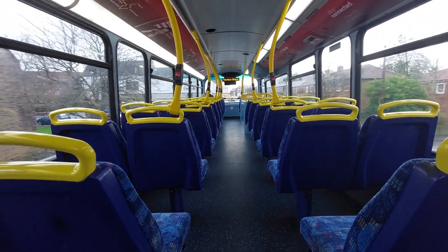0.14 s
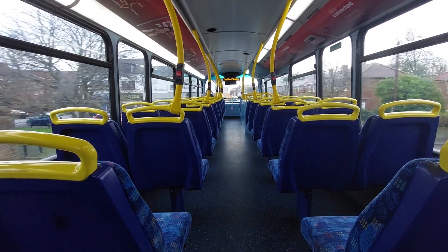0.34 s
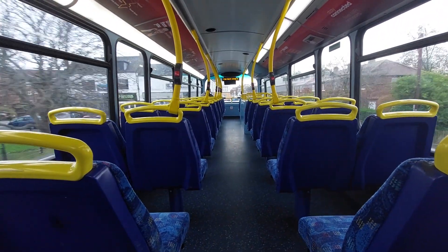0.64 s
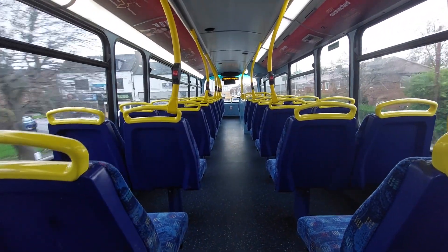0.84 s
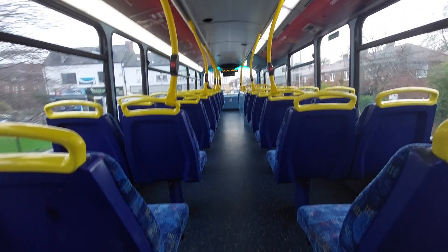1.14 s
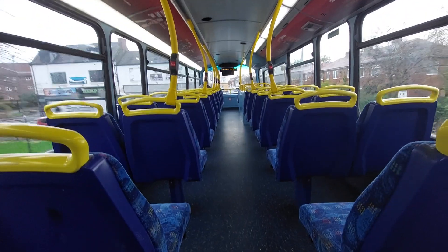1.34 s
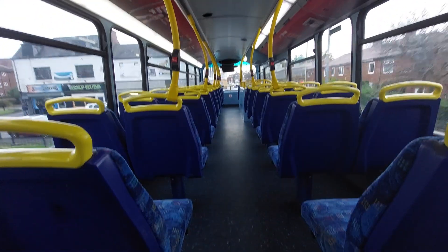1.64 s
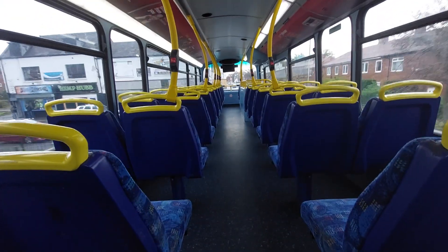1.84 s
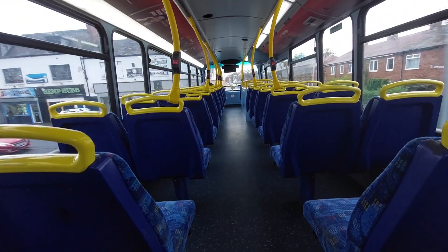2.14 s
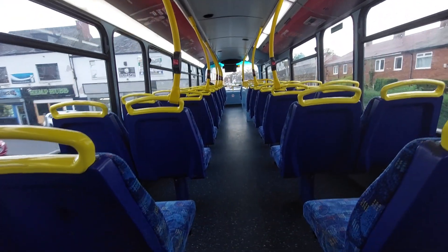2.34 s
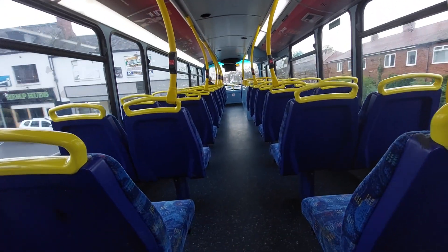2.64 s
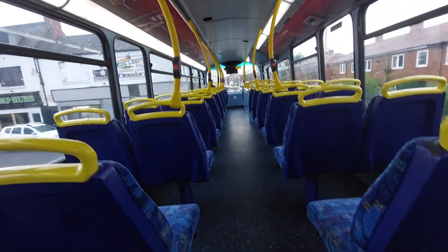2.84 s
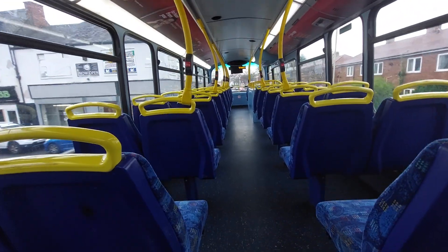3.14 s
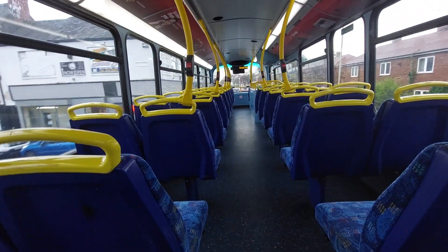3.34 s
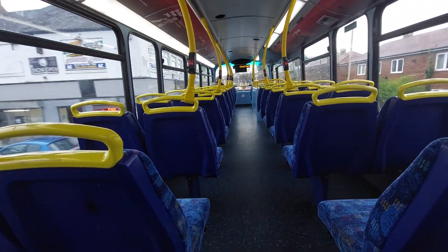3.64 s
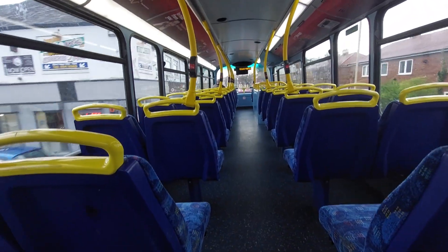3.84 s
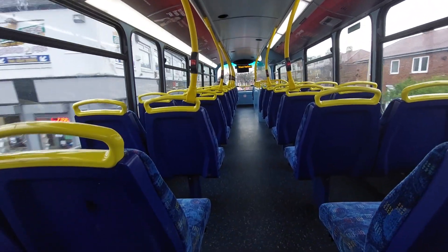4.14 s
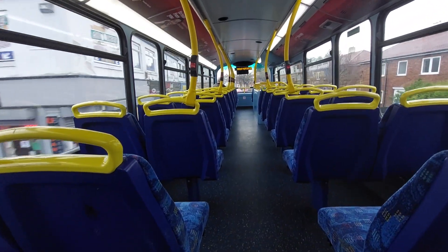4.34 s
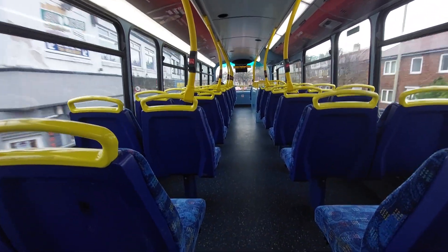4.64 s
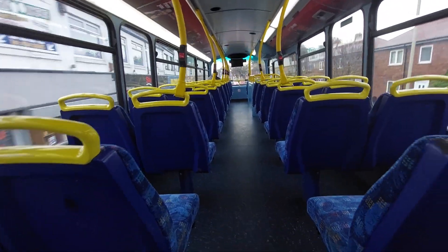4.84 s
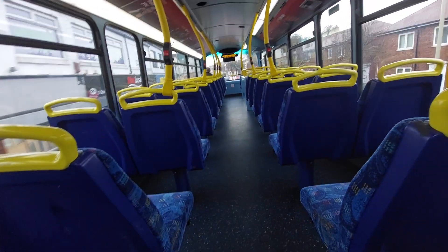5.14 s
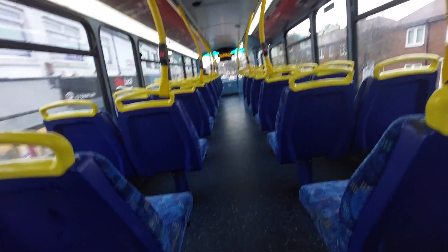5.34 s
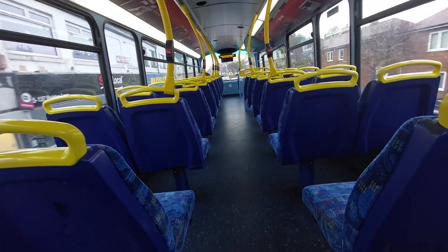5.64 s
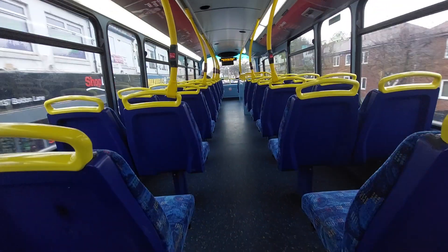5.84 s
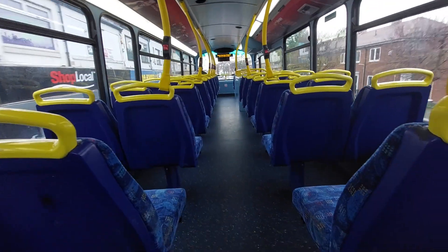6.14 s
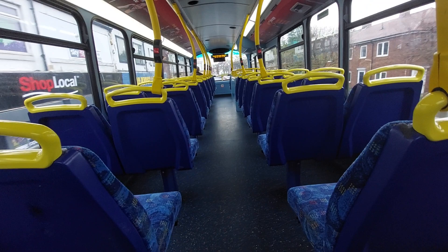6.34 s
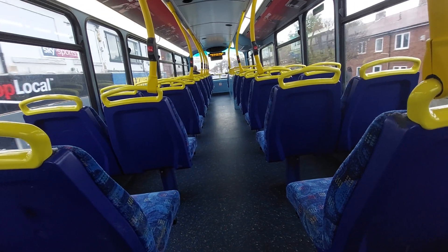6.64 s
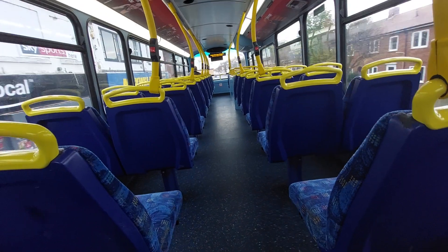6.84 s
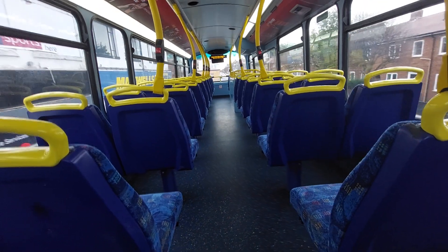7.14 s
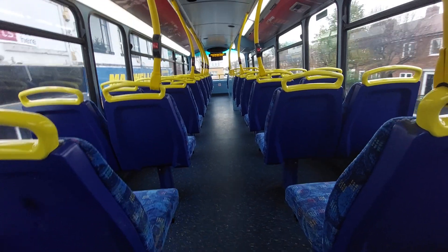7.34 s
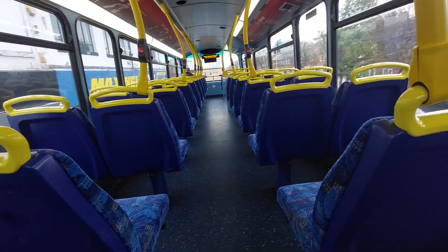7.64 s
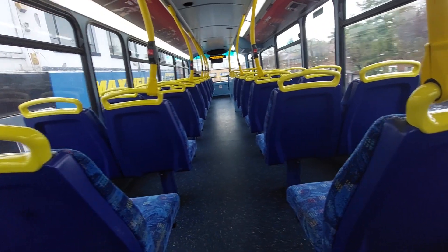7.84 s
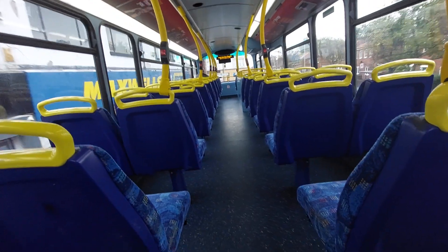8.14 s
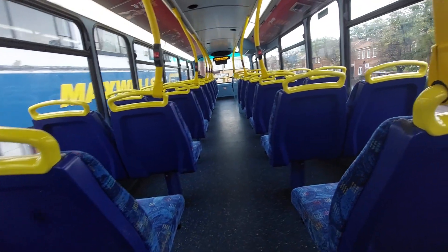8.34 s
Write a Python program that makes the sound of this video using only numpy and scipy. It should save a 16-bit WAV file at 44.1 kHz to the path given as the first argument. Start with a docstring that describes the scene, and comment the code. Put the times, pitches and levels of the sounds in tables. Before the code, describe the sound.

A close, enclosed bus cabin in stereo, dominated by bassy rumble with muffled tyre roar. The engine pulses low and changes revs, while a wavering axle whine slides downward as the bus slows. Small bumps, dry rattles, tiny metallic tinkles, a faint valve hiss and a sagging squeak decorate the ride. One cluster of hard thuds shakes the body, followed by a calmer stretch and returning rumble.

```python
"""Road rumble booms through the upper deck of a double-decker bus, over the diesel's throb.
The rumble is filtered noise; engine, heater fan, drone and sinking axle whine are wavering sine tones.
Bumps and a pothole ring the body as decaying sines; panels and trim rattle as short noise bursts.
A valve hisses once in pipe-coloured noise, rubber squeaks in sagging tones, and a metal fitting tinkles.
As the bus slows, the whine sinks in pitch, coming and going, strongest just before it cuts out near 7.2 s."""
import sys
import numpy as np
from scipy import signal
from scipy.fft import rfft, irfft, next_fast_len
from scipy.io import wavfile
from scipy.ndimage import uniform_filter1d

SR = 44100
rng = np.random.default_rng(int(sys.argv[2]) if len(sys.argv) > 2 else 0)


def unload_audio(sound):
    """Save the sound as a 16-bit wav file, at the path given as the first command line argument."""
    columns = np.transpose(np.atleast_2d(sound))
    # keep every value between -1 and 1, then stretch to whole-number steps
    steps = np.round(np.clip(columns, -1, 1) * 32767)
    wavfile.write(sys.argv[1], SR, steps.astype(np.int16))


N = 373968
TIME = np.arange(N) / SR


def undb(db):
    """Turn decibels into amplitude gain."""
    return 10 ** (np.asarray(db) / 20)


def unit(x):
    """Scale to rms 1."""
    return x / np.sqrt(np.mean(x ** 2))


def decay(t, ring_s):
    """Exponential die-away that loses 60 dB in ring_s."""
    return np.exp(-np.log(1000) * t / ring_s)


def curves(table):
    """Join each column of a table by straight lines in time."""
    s, *columns = np.transpose(table)
    return [np.interp(TIME, s, column) for column in columns]


def resonance_db(hz, peaks):
    """Lift that (centre [Hz], width [Hz], lift [dB]) resonances give to a frequency."""
    return sum(lift / (1 + (2 * (hz - centre) / width) ** 2) for centre, width, lift in peaks)


def colour(x, spectrum, peaks=()):
    """Minimum-phase filter with a (frequency [Hz], gain [dB]) outline and optional resonances."""
    size = next_fast_len(N + 8192)
    f = np.maximum(np.arange(size // 2 + 1) * SR / size, 1)
    hz, db = np.transpose(spectrum)
    gain_db = np.interp(np.log(f), np.log(hz), db) + resonance_db(f, peaks)
    # folding the cepstrum forward in time makes the filter causal
    cepstrum = irfft(np.log(undb(gain_db)), size)
    cepstrum[1:size // 2] *= 2
    cepstrum[size // 2 + 1:] = 0
    response = np.exp(rfft(cepstrum))
    return irfft(rfft(x, size) * response, size)[..., :N]


def walk(rate):
    """Smooth random drift of rms 1 that changes about rate times a second."""
    k = max(int(SR / rate), 1)
    steps = np.repeat(rng.standard_normal(N // k + 1), k)
    return unit(uniform_filter1d(steps, k)[:N])


# stereo width of diffuse sound: (frequency [Hz], side minus mid [dB])
WIDTH = [(30, -24), (60, -4), (125, -18), (250, -9), (500, -5), (1000, 4), (2000, 0), (16000, 0.5)]
# the cabin's many narrow modes ripple the treble
MODE_RIPPLE_DB, MODE_SPACING_HZ, MODE_FROM_HZ = 1.6, 32, 900


def diffuse(spectrum, peaks=()):
    """Cabin-filling noise with mid of rms 1, its treble rippled by narrow modes and its sides set by WIDTH."""
    hz = np.arange(MODE_FROM_HZ, SR / 2, MODE_SPACING_HZ)
    ripple_db = MODE_RIPPLE_DB * rng.standard_normal(len(hz)) * (hz > MODE_FROM_HZ)
    noise = colour(rng.standard_normal((2, N)), np.column_stack([hz, ripple_db]))
    mid, side = colour(noise, spectrum, peaks)
    side = colour(side, WIDTH)
    return np.array([mid + side, mid - side]) / np.std(mid)


def tone(hz, flutter, spread):
    """A sine whose strength and phase waver as the body flexes, a little differently on each side."""
    carrier = np.sqrt(2) * np.exp(2j * np.pi * np.cumsum(hz * np.ones(N)) / SR)
    mid = (carrier * (1 + flutter * (walk(11) + 1j * walk(11)))).imag
    side = spread * (carrier * (1j + .5 * walk(4.6))).imag
    return np.array([mid + side, mid - side])


def blows(rows, ring_s, rise_s, chatter, crack_db, crack_s):
    """Envelope of (time [s], level [dB]) blows: a brief crack over an uneven tail that dies away."""
    t = TIME[:SR]
    fall = decay(t, ring_s) + undb(crack_db) * np.exp(-t / crack_s)
    shape = fall * (1 - np.exp(-t / rise_s))
    power = np.zeros(N + SR)
    for s, db in rows:
        start = int(s * SR)
        power[start:start + SR] += (undb(db) * shape) ** 2
    return np.sqrt(power[:N]) * undb(chatter * walk(400))


# roughness of the road: (time [s], rumble level [dB])
ROAD = [(0, -27.5), (1.9, -27.5), (2.4, -28), (3.5, -28.5), (4.7, -26.5), (5.05, -31), (5.45, -26.5),
        (6, -33.5), (6.7, -35), (7.25, -27.5), (8.48, -27.5)]
# outline of the rumble: (frequency [Hz], relative gain [dB])
RUMBLE = [(20, -7.5), (32, -6), (43, 4), (62, 0), (80, 1), (135, -.5), (185, -0.5), (245, -4.5),
          (330, -8.5), (450, -15.5), (680, -18), (950, -32), (1600, -64.5)]
# cabin resonances in the rumble: (centre [Hz], width [Hz], lift [dB])
CABIN = [(159.4, 14, 5), (233.3, 16, 2.5), (318.5, 27, 5.5), (591, 15, 4.5), (700, 34, -0.5)]
# outline of the tyre roar: (frequency [Hz], relative gain [dB])
ROAR = [(400, -4), (800, 6), (1200, 2), (1750, 2.5), (2500, -4.5), (3400, -12), (5000, -15.5),
        (7300, -21.5), (8800, -32), (10500, -34), (12000, -28), (16000, -35)]
ROAR_DB = -21.5  # relative to the rumble


def road():
    """The road shakes the body shell into a resonant rumble, and tyre roar rides on top."""
    db, = curves(ROAD)
    rumble = undb(0.92 * walk(14)) * diffuse(RUMBLE, CABIN)
    roar = undb(ROAR_DB + 0.67 * walk(24)) * diffuse(ROAR)
    return undb(db) * (rumble + roar)


# diesel speed and throb: (time [s], firing rate [Hz], firing tone level [dB], octave level [dB])
ENGINE = [(0, 44.8, -35, -36), (.9, 43, -35, -42), (1.62, 43.4, -34.5, -40), (1.9, 50.3, -28, -38),
          (2.2, 57.3, -42, -35.5), (2.75, 55.7, -39, -34.5), (2.95, 55.7, -39, -39),
          (3.25, 55.3, -29.5, -40), (4.5, 53.1, -29, -39), (4.7, 52.9, -35, -42), (5.05, 52.3, -29, -42),
          (5.3, 51.5, -35, -43), (6.5, 47.6, -38.5, -46), (7.3, 45.5, -31, -37), (7.7, 51.3, -29, -38),
          (8.1, 54.7, -30.5, -34.5), (8.48, 52.4, -29, -44)]


def engine():
    """Only the four lowest harmonics of the uneven firings reach the upper deck."""
    hz, firing_db, octave_db = curves(ENGINE)
    firing = tone(hz, flutter=.2, spread=.1)
    octave = tone(2 * hz, flutter=.2, spread=.2)
    third = tone(3 * hz, flutter=.25, spread=.25)
    fourth = tone(4 * hz, flutter=.25, spread=.3)
    upper = octave + undb(-5.0) * third + undb(-6.5) * fourth
    return undb(firing_db) * firing + undb(octave_db) * upper


# axle gears, turning with the road speed: (time [s], mesh rate [Hz], relative whine level [dB])
AXLE = [(0, 512, -42), (.6, 502, -44.5), (.85, 495, -48), (1.3, 489, -42.5), (1.55, 478, -49),
        (1.85, 470, -48), (2.1, 461, -55), (2.75, 445, -43), (3.25, 440, -48), (3.5, 436, -54),
        (3.85, 433, -47), (4.6, 424.5, -45), (4.95, 416, -50), (6.35, 388, -51), (6.55, 383.5, -42.5),
        (7.12, 368, -38), (7.3, 366, -63)]
# partials of the tyre and shaft drone: frequency as a share of the mesh rate [ratio]
DRONE_ORDERS = [.105, .209, .319, .478]
# drone partials swelling and fading: (time [s], level of each of the four partials [dB])
DRONE = [(0, -39, -43, -33, -55), (.9, -40, -43, -36.5, -46), (1.35, -39, -45, -38.5, -34),
         (1.75, -41, -44, -36, -38), (2.0, -38, -44, -29.5, -44.5), (2.3, -53, -40, -39, -45),
         (3, -50, -39, -40, -45), (4.5, -49, -38, -39, -48), (6.5, -48, -45.5, -54, -59),
         (8.48, -48, -44, -47, -39)]


def driveline():
    """Gear whine and the drone of shaft and tyres sink in pitch together with the road speed."""
    hz, whine_db = curves(AXLE)
    drone = 0
    for share, db in zip(DRONE_ORDERS, curves(DRONE)):
        drone = drone + undb(db) * tone(share * hz, flutter=.2, spread=.2)
    # speed shakes the whine; it steadies as the bus slows
    shaking = (hz - np.min(hz)) / np.ptp(hz)
    shaken_hz = hz * (1 + .004 * shaking * walk(18))
    whine = tone(shaken_hz, flutter=.15 + .4 * shaking, spread=.7)
    return undb(whine_db - 3) * whine + drone


# wheels over bumps and through a pothole: (time [s], relative level [dB], thump pitch [Hz])
THUDS = [(1.189, -28, 89.5), (1.799, -27.5, 171), (1.94, -27.5, 150), (4.755, -26.5, 315),
         (5.299, -22, 258), (5.313, -17, 200), (5.342, -21, 312.5), (5.383, -13, 216), (5.431, -18, 165),
         (5.458, -20, 234), (5.625, -25.5, 237.5), (5.776, -27.5, 301), (7.135, -31, 148)]
# modes of a thump: (share of its pitch [ratio], level [dB], ring time [s])
THUMP_MODES = [(.36, -2.5, .14), (.72, -2, .1), (1, 0, .09), (1.47, -4, 0.083), (2.3, -11.5, .06),
               (3.3, -17.5, .05)]
# outline of the booming body: (frequency [Hz], relative gain [dB])
BODY = [(25, -48), (50, 4), (80, 3.5), (125, -3.5), (175, -1.5), (245, 1.5), (340, -2.5), (480, -16.5),
        (700, -29), (1100, -31), (3000, -64)]
# body shell resonances when jolted: (centre [Hz], width [Hz], lift [dB])
SHELL = [(75.2, 11, 8), (166, 28, 8), (263, 29, 9.5), (332, 20, 5)]
# outline of loose panels, here and in the rattles: (frequency [Hz], relative gain [dB])
PANEL = [(150, 2.5), (320, 14.5), (700, 11.5), (1100, 6), (1900, 2), (3000, -10), (5000, -18), (8000, -26),
         (16000, -47)]
THUMP_DB, THUMP_PUSH_S = 3.5, .003
THUD_TAIL_DB, THUD_KNOCK_DB, THUD_RING_S = -5.5, -17.5, 0.5  # shell boom, weaker panel chatter


def jolts():
    """Each jolt thumps one part of the body shell, then the whole shell booms and its panels chatter."""
    thumps, t = np.zeros(N + SR), TIME[:SR]
    push = 1 - np.exp(-(t / THUMP_PUSH_S) ** 2)
    for s, db, hz in THUDS:
        ring = 0
        for share, mode_db, ring_s in THUMP_MODES:
            ring = ring + undb(mode_db) * decay(t, ring_s) * np.sin(2 * np.pi * share * hz * t)
        start = int(s * SR)
        thumps[start:start + SR] += undb(db) * push * ring
    hits = [(s, db) for s, db, _ in THUDS]
    shaking = blows(hits, THUD_RING_S, rise_s=0.0024, chatter=1.8, crack_db=1, crack_s=.008)
    tail = undb(THUD_TAIL_DB) * diffuse(BODY, SHELL) + undb(THUD_KNOCK_DB) * diffuse(PANEL)
    return undb(THUMP_DB) * thumps[:N] + shaking * tail


# fine buzz of loose fittings, also guiding the stray ticks: (time [s], relative level [dB])
BUZZ = [(0, -80), (.7, -76), (.9, -64), (1.6, -74), (2.2, -67), (3.15, -61.5), (3.5, -69), (4.3, -66),
        (4.8, -57), (5.1, -65.5), (5.55, -59), (5.9, -70.5), (7.0, -74.5), (7.35, -63), (8.48, -67.5)]
STRAY_PER_S, STRAY_SCATTER_DB = 6.4, 4.5
STRAY_BODY_DB, STRAY_EDGE_DB = 0.5, -0.5  # relative to the BUZZ curve


def stray_ticks():
    """Faint ticks at random moments, stronger while the fittings buzz: rows like TICKS."""
    when, size = rng.random(200), rng.standard_normal(200)
    times = np.cumsum(-np.log(1 - when)) / STRAY_PER_S
    levels = np.interp(times, *np.transpose(BUZZ)) + STRAY_SCATTER_DB * size
    return [(s, db + STRAY_BODY_DB, db + STRAY_EDGE_DB) for s, db in zip(times, levels) if s < TIME[-1]]


# loose panels knock: (time [s], level [dB])
KNOCKS = [(.259, -57), (.682, -49.5), (.748, -59), (1.182, -53), (1.375, -50), (1.777, -51), (2.862, -48.5),
          (3.018, -46.5), (3.693, -55), (4.089, -47.5), (4.641, -48), (4.783, -48), (5.106, -67),
          (5.311, -46), (5.341, -41), (5.352, -40), (5.367, -39), (5.38, -37), (5.39, -44), (5.405, -39),
          (5.428, -40), (5.462, -48), (5.549, -44), (5.785, -50), (5.952, -52), (6.045, -53.5),
          (7.092, -50), (7.241, -50), (7.334, -49.5), (7.42, -48), (7.432, -50), (7.721, -54), (7.931, -47),
          (8.449, -56)]
# loudest ticks of the plastic trim: (time [s], relative body level [dB], relative bright edge level [dB])
TICKS = [(.83, -68, -60), (.941, -52, -65), (1.089, -66, -52.5), (1.102, -66, -54), (1.346, -76, -54.5),
         (1.372, -62, -63), (1.564, -55, -57), (2.049, -58, -51), (2.211, -60, -52), (2.71, -57, -53),
         (2.862, -52, -51), (3.018, -49, -68), (3.61, -53, -53), (4.089, -60, -61), (4.429, -54, -47),
         (4.52, -49.5, -57), (4.582, -49, -60), (4.63, -53, -46.5), (4.694, -55, -51), (4.752, -49, -52),
         (5.258, -46, -50), (5.297, -56, -45), (5.34, -35, -32.5), (5.38, -40, -56), (5.423, -38, -34.5),
         (5.541, -44.5, -40.5), (5.6, -53, -47), (5.666, -50, -56), (5.777, -64, -54), (6.038, -62, -58),
         (6.185, -55, -61), (6.23, -58, -72), (7.423, -50, -68)]
# outline of the tick bodies: (frequency [Hz], relative gain [dB])
TRIM = [(800, -12), (2000, 16), (4500, 8), (7500, 0.5), (9000, -9), (16000, -10)]
# outline of the bright edges and of the buzz: (frequency [Hz], relative gain [dB])
SIZZLE = [(1000, -6.5), (3000, -0.5), (7300, 0), (9000, -8), (10500, -4), (12000, 0.5), (14000, -1.5),
          (16000, 0)]
KNOCK_RING_S, TICK_RING_S = 0.27, 0.42


def rattles():
    """Panels give short, dry knocks and the trim ticks; the cabin adds a tail to each blow."""
    trim = TICKS + stray_ticks()
    bodies = [(s, db) for s, db, _ in trim]
    bright = [(s, db) for s, _, db in trim]
    knocks = blows(KNOCKS, KNOCK_RING_S, rise_s=.0008, chatter=1.5, crack_db=10, crack_s=.009)
    knocks = knocks * diffuse(PANEL)
    ticks = blows(bodies, TICK_RING_S, rise_s=.0007, chatter=1.8, crack_db=4, crack_s=.003)
    ticks = ticks * diffuse(TRIM)
    edges = blows(bright, TICK_RING_S, rise_s=0.00032, chatter=2.2, crack_db=5, crack_s=.0025)
    edges = edges * diffuse(SIZZLE)
    return knocks + undb(-6.0) * ticks + undb([[-5.8], [-6.8]]) * edges  # edges: left, right


# outline of the compressed air: (frequency [Hz], relative gain [dB])
AIR = [(1500, -2), (2800, 9.5), (4500, 3), (7300, -0.5), (9000, -12), (10500, -11), (11800, -3),
       (13300, -1), (14500, -7), (16000, -12)]
# resonances of the air pipe: (centre [Hz], width [Hz], lift [dB])
AIR_PIPE = [(2730, 220, 3.5), (3300, 300, 0.5)]


def air_valve(start_s=1.728, db=-49, open_s=0.032, ring_s=3.5):
    """A valve lets off compressed air through a ringing pipe; the hiss swells, then fades with the pressure."""
    t = np.maximum(TIME - start_s, 0)
    opening = 1 - np.exp(-t / open_s)
    return undb(db + 0.8 * walk(90)) * opening * decay(t, ring_s) * diffuse(AIR, AIR_PIPE)


# rubber seals squeak: (time [s], length [s], starting pitch [Hz], level [dB])
SQUEAKS = [(1.041, .035, 5400, -52), (2.915, .245, 1880, -45)]
# the soft rubber dulls them: (frequency [Hz], gain [dB])
SEAL = [(4000, -0.5), (6000, -7), (10000, -17)]
SQUEAK_ATTACK_SHARE, SQUEAK_SAG_HZ_PER_S, SQUEAK_OCTAVE_DB = .14, 700, -16.5


def squeak():
    """Rubber sticks and slips on glass at a ragged, falling rate, loudest early on."""
    out = 0
    for s, length, start_hz, db in SQUEAKS:
        pressure = np.interp(TIME - s, [0, SQUEAK_ATTACK_SHARE * length, length], [0, 1, 0]) ** 2
        hz = start_hz - SQUEAK_SAG_HZ_PER_S * np.clip(TIME - s, 0, length)
        hz = hz * (1 + .025 * walk(450))
        slips = tone(hz, flutter=.05, spread=.7)
        octave = undb(SQUEAK_OCTAVE_DB) * pressure * tone(2 * hz, flutter=.2, spread=.7)
        out = out + pressure * undb(db + 2 * walk(113)) * (slips + octave)
    return colour(out, SEAL)


# a small metal fitting tinkles: (time [s], relative level [dB])
TINKLES = [(1.09, -59.5), (1.225, -65), (1.992, -58), (2.047, -58), (2.37, -62), (2.49, -61), (3.125, -60),
           (3.235, -59.5), (5.59, -57), (6.487, -66), (6.745, -63.5), (6.85, -72), (6.9, -63), (8.42, -64)]
# modes of the fitting: (frequency [Hz], relative level [dB], ring time [s])
FITTING = [(4985, -2, .14), (5030, -9, .1), (13780, -8, .12), (14020, -9, .11)]
BOUNCE_GAP_S, BOUNCE_RISE_DB = .013, 1  # each bounce is a little stronger than the one before


def fitting():
    """Each tinkle is four quick, scraping bounces of a small metal part that rings in a few high modes."""
    out, t = np.zeros((2, N + SR)), TIME[:SR // 2]
    for s, db in TINKLES:
        for bounce in range(4):
            start = int((s + bounce * BOUNCE_GAP_S * rng.uniform(.7, 1.3)) * SR)
            for hz, mode_db, ring_s in FITTING:
                detune = 1 + .004 * rng.standard_normal()
                phase = 2 * np.pi * (hz * detune * t + rng.random((2, 1)))
                gain = undb(db + mode_db + BOUNCE_RISE_DB * bounce)
                out[:, start:start + len(t)] += gain * decay(t, ring_s) * np.sin(phase)
    return out[:, :N] * undb(2 * walk(320))


# heater fan hum: (frequency [Hz], level [dB])
FAN = [(215, -38), (376, -57.5), (429, -55.5), (590, -57.5), (695, -63.5), (1094, -76.5), (1203, -74.5)]


def fan():
    """The heater blower hums in several tones; the hum wavers and swells as the body shakes."""
    rumble_db, = curves(ROAD)
    shaking = undb(0.77 * (rumble_db - np.mean(rumble_db)))
    speed = 1 + .0015 * walk(3)
    hum = 0
    for hz, db in FAN:
        # higher tones waver more and sit wider
        hum = hum + undb(db) * tone(hz * speed, flutter=min(.1 + hz / 900, .85), spread=min(hz / 900, .8))
    return shaking * hum


def buzz():
    """Tiny contacts all over the deck merge into a sizzle; a few near ones stand out as single clicks."""
    db, = curves(BUZZ)
    far = undb(0.6 * walk(25) + 1.5 * walk(280)) * diffuse(SIZZLE)
    contacts = (rng.random(N) < 30 / SR) * rng.standard_normal((2, N))  # about 30 a second
    near = .3 * unit(colour(contacts, SIZZLE))
    return undb(db - 1.5) * (far + near)


# stereo lean, shared equally between the sides: (frequency [Hz], left minus right [dB])
LEAN = [(30, 1), (125, -3.5), (500, -2), (1000, -2), (2000, 0.5), (4000, 3), (8000, -0.5), (13000, -3.5)]


def scene():
    """All layers as heard from a rear seat of the upper deck, with a lean that varies over pitch."""
    tones = engine() + driveline() + fan()
    noises = road() + buzz() + air_valve()
    left, right = tones + noises + jolts() + rattles() + fitting() + squeak()
    left = colour(left, [(hz, db / 2) for hz, db in LEAN])
    right = colour(right, [(hz, -db / 2) for hz, db in LEAN])
    return np.array([left, right])


TOP_HZ = 15830


def record(dry):
    """Cut the top steeply with an elliptic low-pass."""
    return signal.sosfilt(signal.ellip(10, .1, 80, TOP_HZ, fs=SR, output="sos"), dry)


dry = scene()
out = record(dry)
unload_audio(out)
```